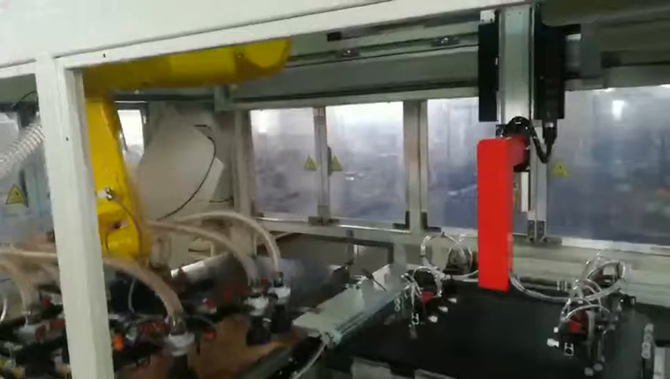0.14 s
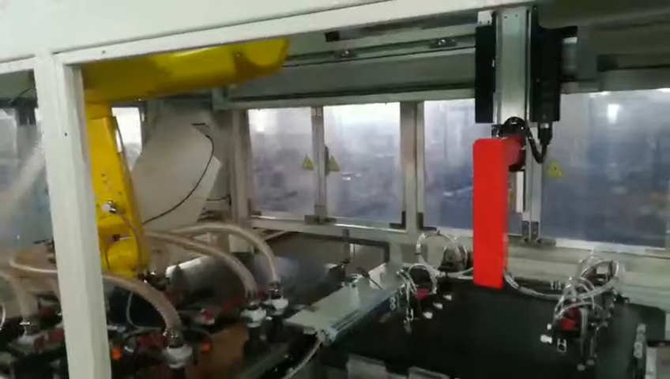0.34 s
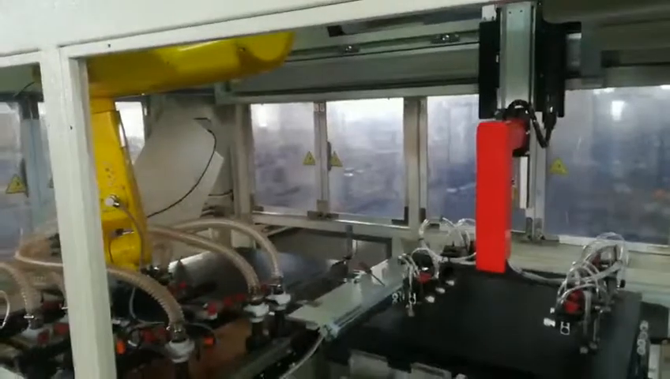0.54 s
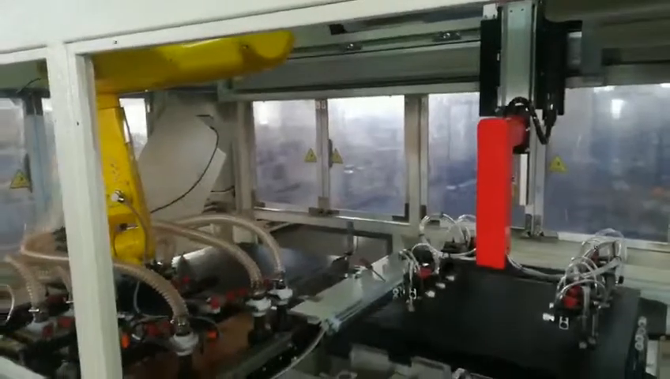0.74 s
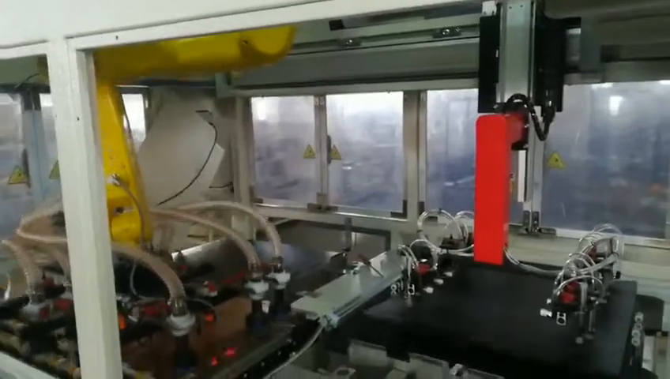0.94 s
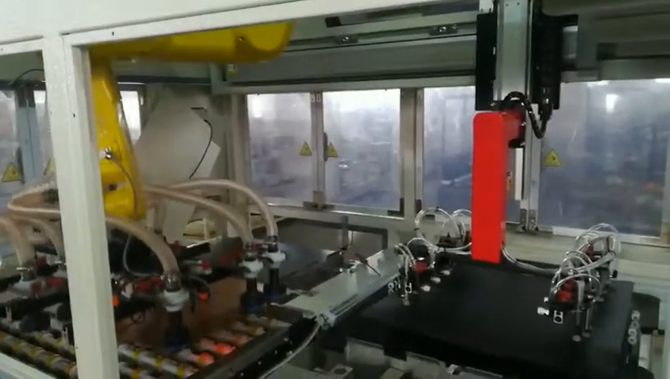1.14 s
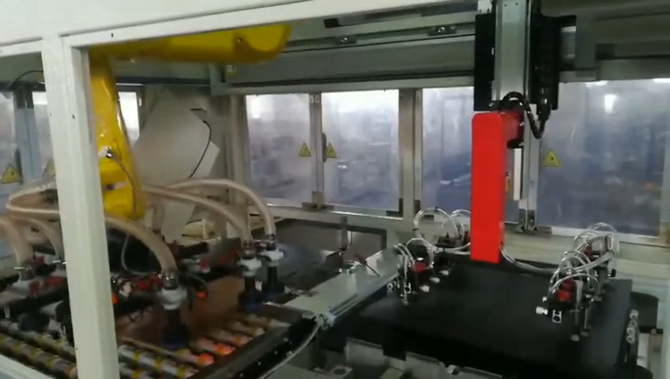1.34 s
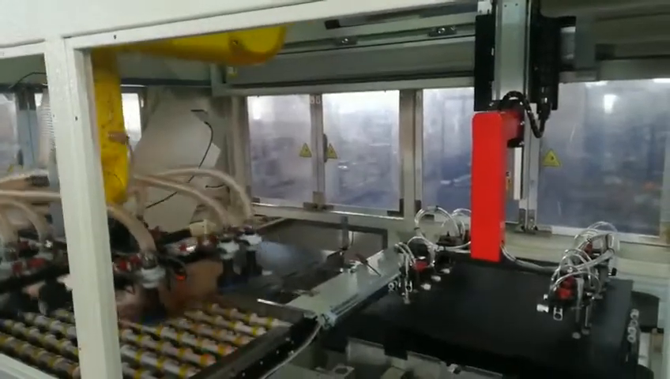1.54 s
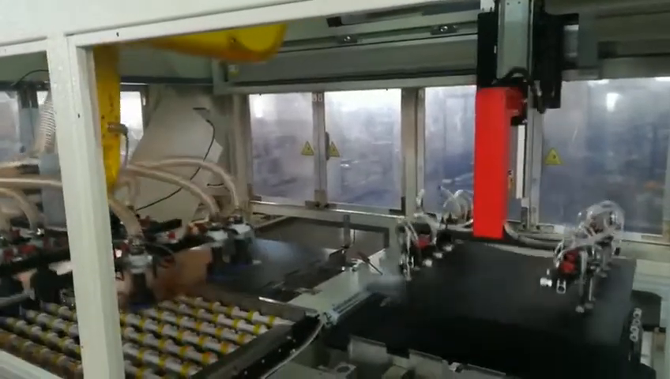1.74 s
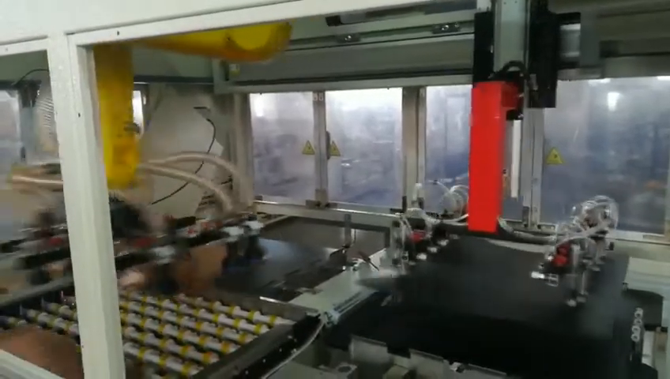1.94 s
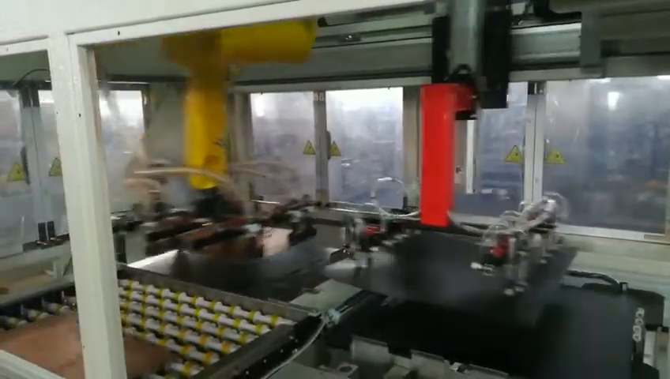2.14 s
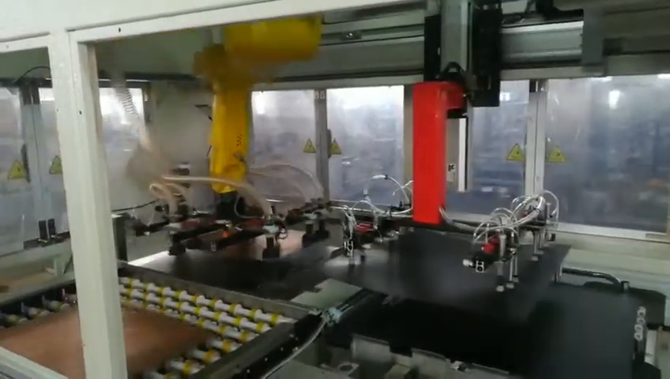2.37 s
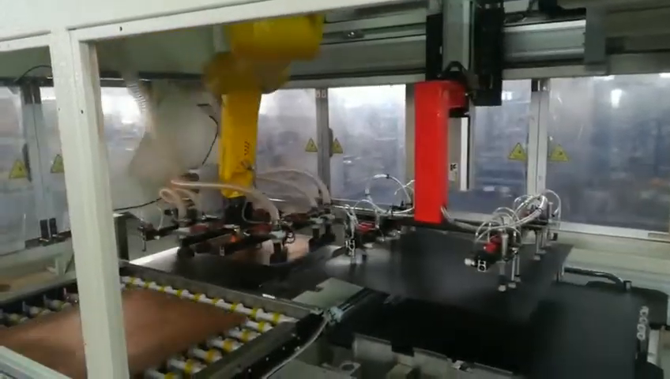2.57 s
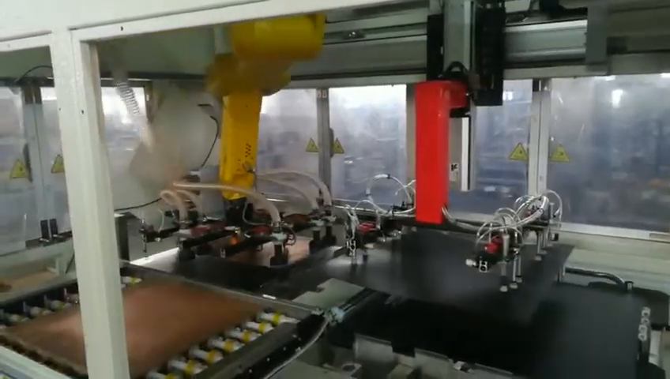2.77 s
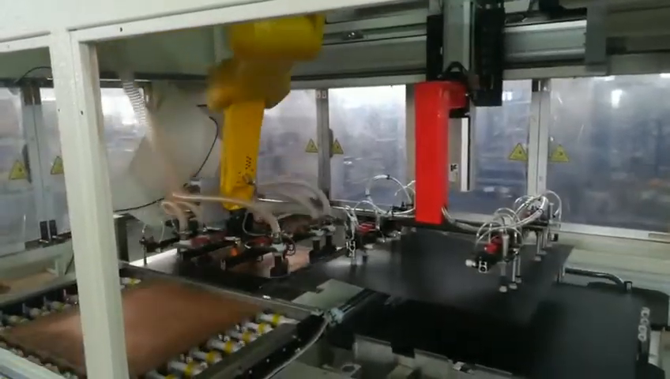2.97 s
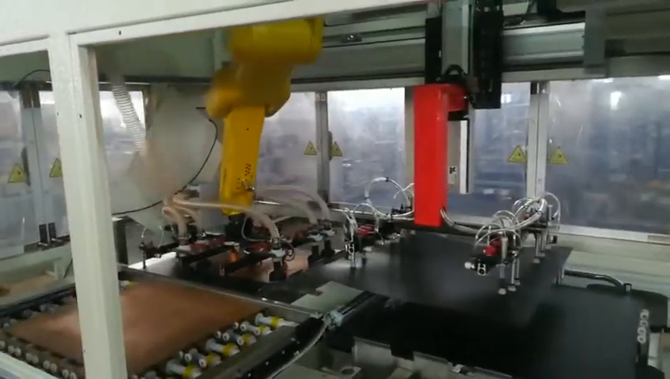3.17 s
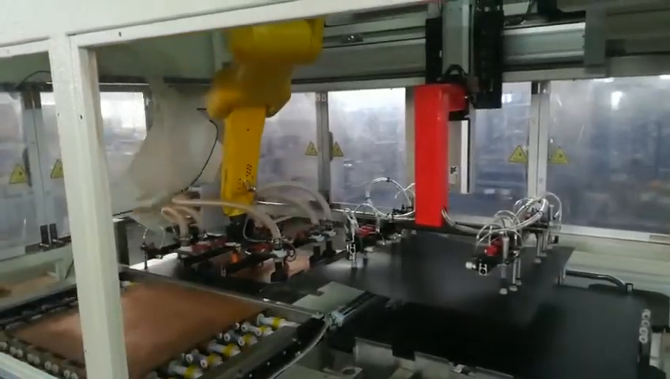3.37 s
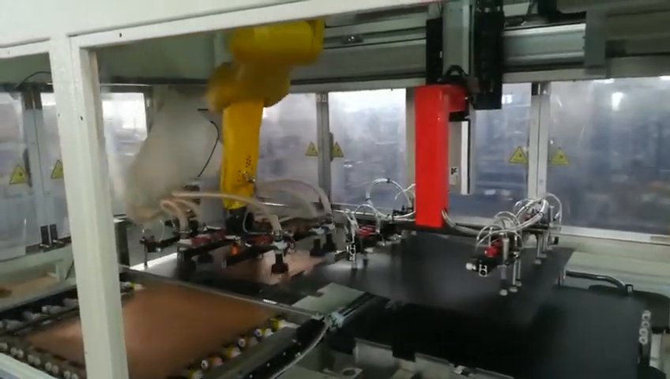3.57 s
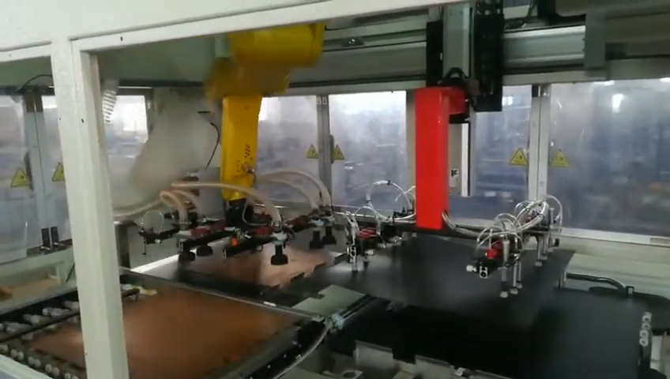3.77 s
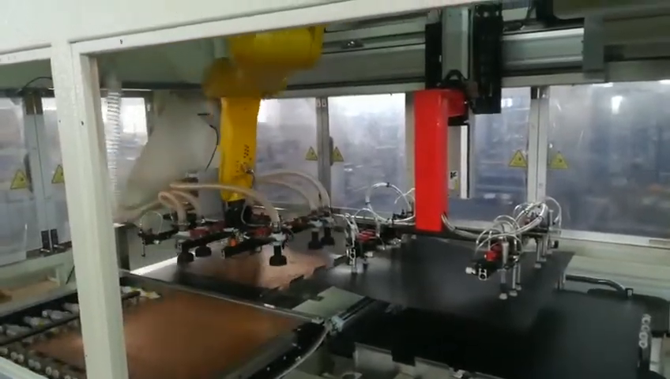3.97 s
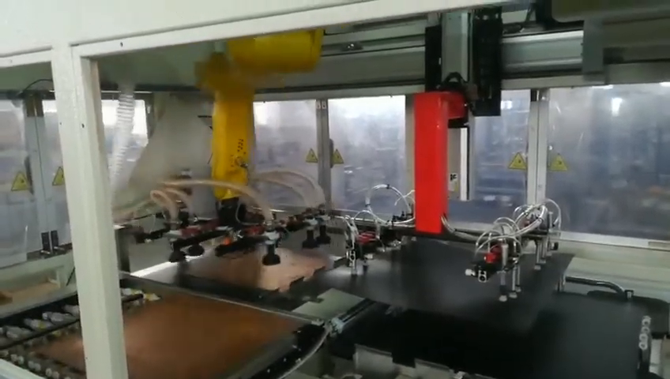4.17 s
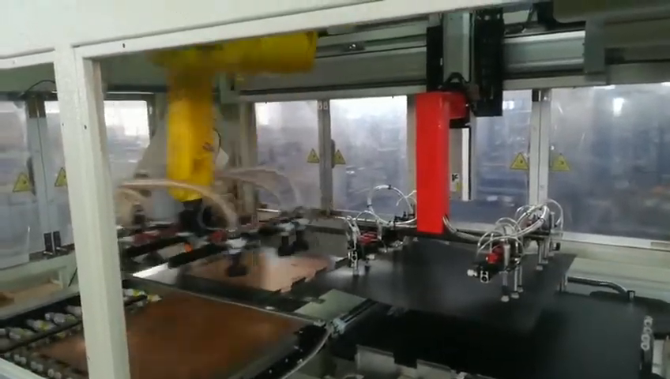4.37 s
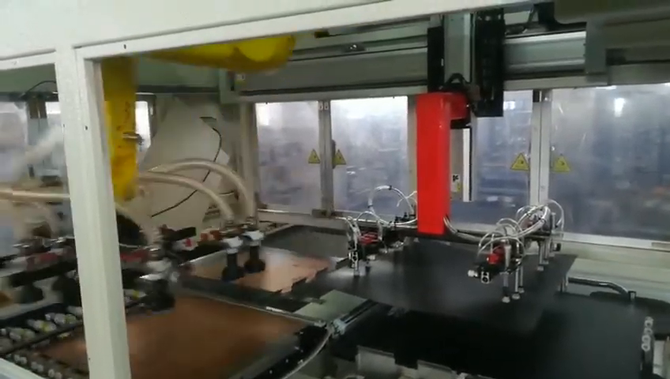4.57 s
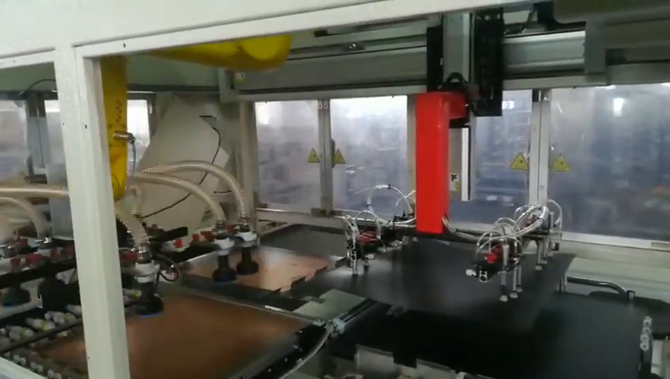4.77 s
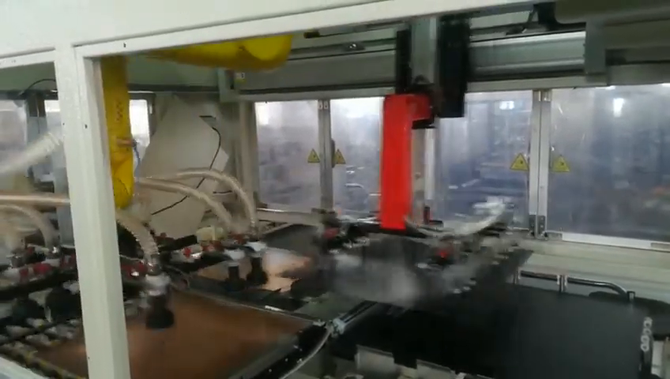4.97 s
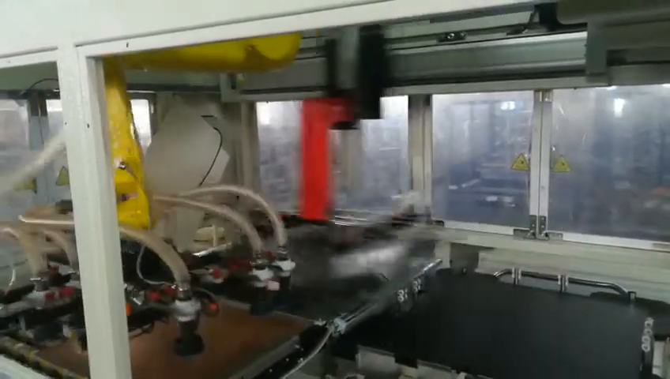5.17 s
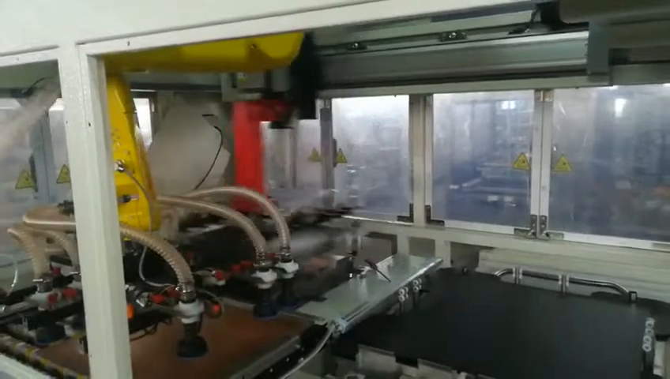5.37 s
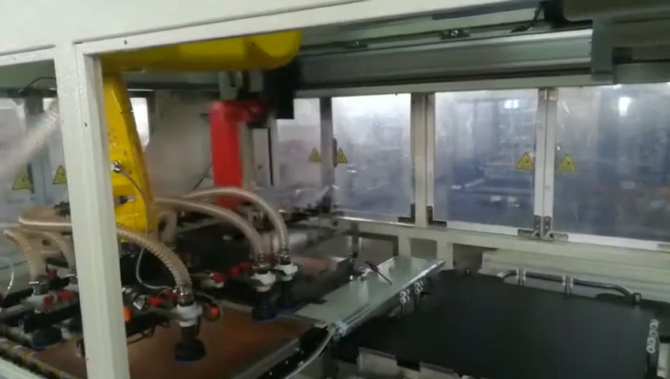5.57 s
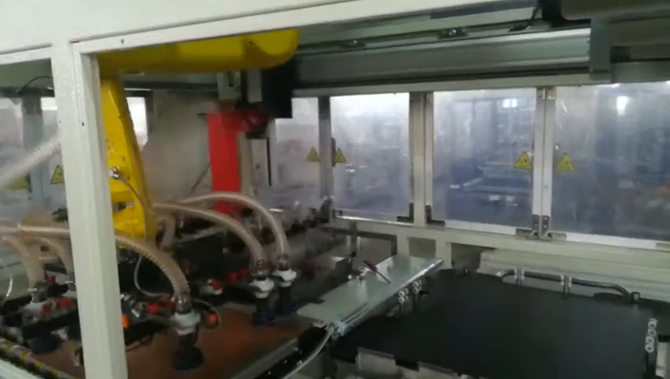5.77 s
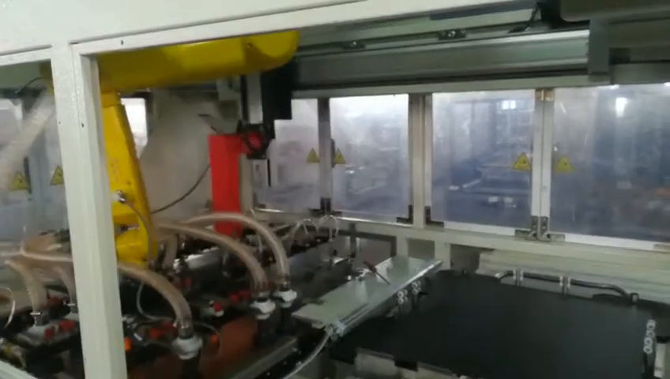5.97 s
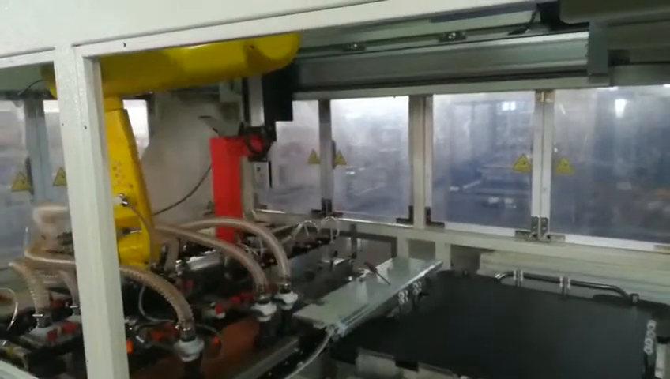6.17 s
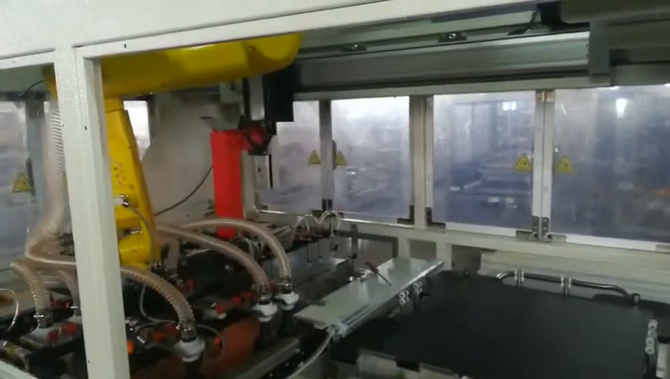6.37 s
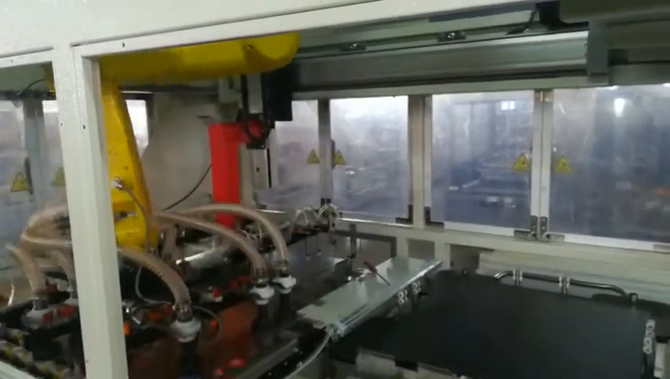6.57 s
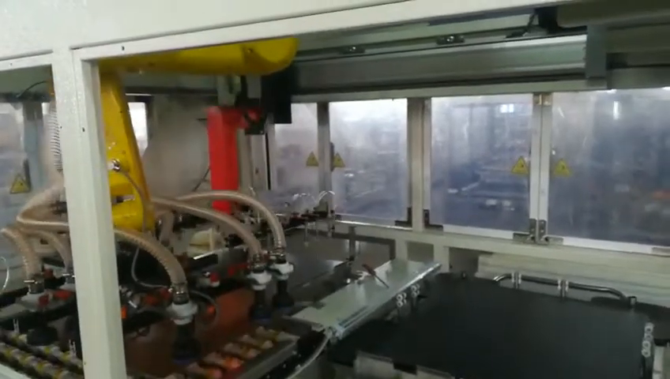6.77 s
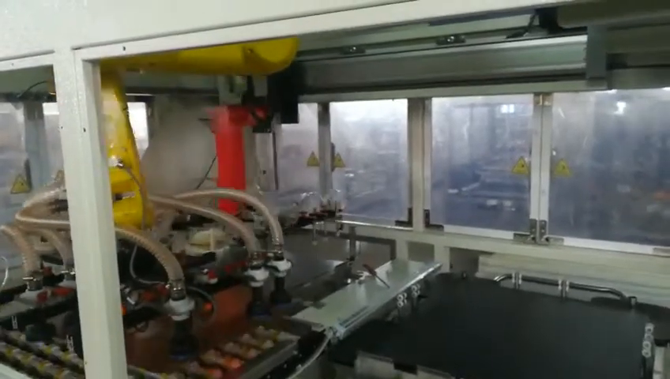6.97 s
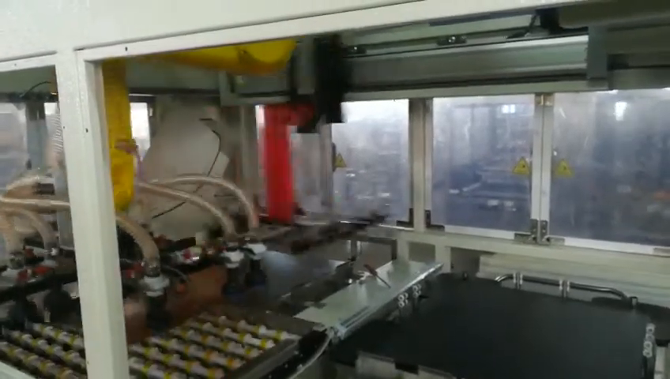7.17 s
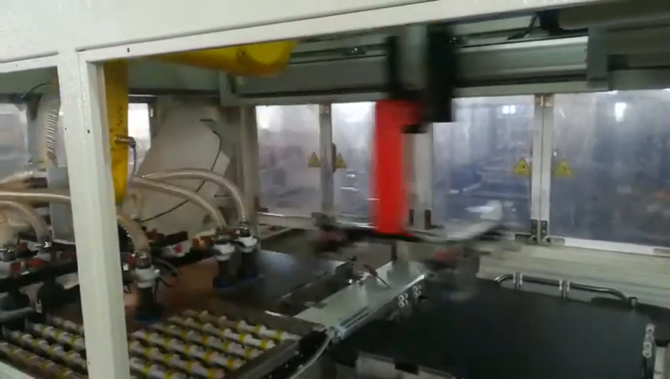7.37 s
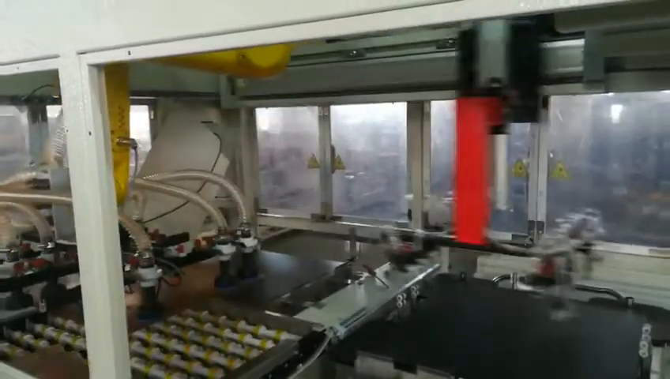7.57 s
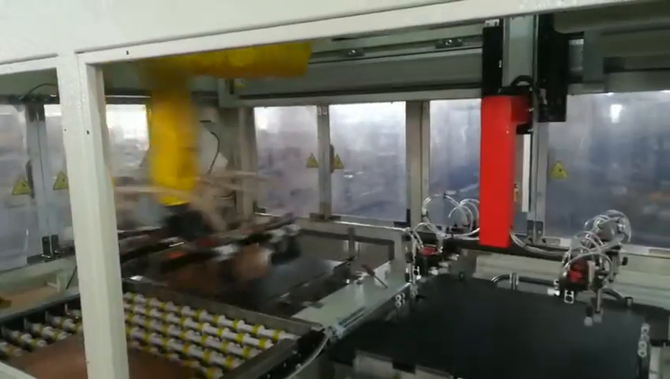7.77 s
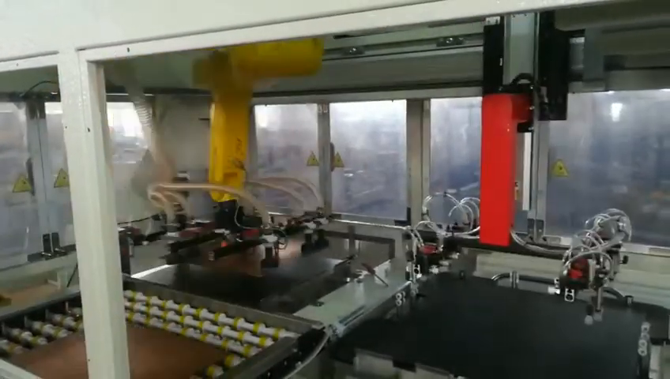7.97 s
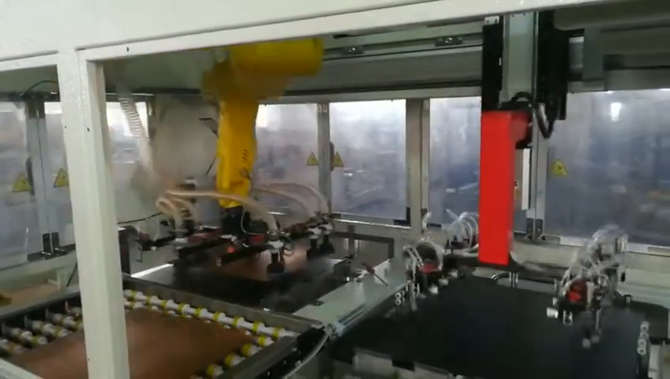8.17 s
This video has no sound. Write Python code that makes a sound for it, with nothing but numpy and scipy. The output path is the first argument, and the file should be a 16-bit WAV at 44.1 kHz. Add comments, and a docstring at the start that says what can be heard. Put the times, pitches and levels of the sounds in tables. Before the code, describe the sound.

Robot suction cell: whistling air hiss, sharp metallic clunks, blubbering hoses, a three-second lull in the hiss, then it resumes amid whirring motors.

```python
"""Vacuum ejectors hiss with a 5 kHz whistle, noise through silencer resonances, and stop for three seconds.
They feed the suction grippers of a robot cell that moves circuit boards. A suction blower whines, a tone
that sags under load; when its valve switches, air blubbers through hoses and cups as resonant noise.
Servo axes whirr as noise bands that follow speed, valves puff, and air and sliding hoses squeal.
The gripper clunks as a sum of decaying modes, and the factory hums all the while as shaped noise and tones."""
import sys
import numpy as np
from scipy import signal
from scipy.fft import rfft, irfft, next_fast_len
from scipy.io import wavfile
from scipy.ndimage import uniform_filter1d, map_coordinates

SR = 44100
rng = np.random.default_rng(int(sys.argv[2]) if len(sys.argv) > 2 else 0)


def put_to_file(sound):
    """Save the sound as 16-bit audio at rate SR, in the file named by the first command-line argument."""
    columns = np.atleast_2d(sound).T  # one column per channel
    safe = np.clip(columns, -1, 1)
    whole_steps = np.round(safe * 32767)
    wavfile.write(sys.argv[1], SR, whole_steps.astype(np.int16))


N = 362061

# Gulps of air through hoses and cups: start t/s, end t/s, boom delay/s, hose f/Hz, cup f/Hz,
# relative levels of boom/dB, flutter/dB, ring/dB
GULPS = [(.29, .314, .005, 240, 1467, -34, -21, -32), (.36, .8, .005, 185, 1400, -36, -40, -46),
         (3.25, 3.475, 0.049, 254.7, 1758, -25, -27, -27),
         (4.028, 4.251, 0.017, 328.8, 1690, -29.5, -33.5, -27.5),
         (5.949, 6.013, .016, 335, 1755, -24.5, -24.5, -36)]


def amp(db):
    """Level definition: decibels to an amplitude ratio."""
    return 10 ** (np.asarray(db) / 20)


def unit(x):
    """Normalisation: scale to an rms of 1."""
    return x / np.sqrt(np.mean(x ** 2) + 1e-20)


def clock():
    """Uniform sampling: the time of each sample in seconds."""
    return np.arange(N) / SR


def along(points, hz):
    """Interpolation of (f/Hz, value) points on a logarithmic frequency axis."""
    f, v = np.transpose(points)
    return np.interp(np.log(hz + 1), np.log(f + 1), v)


def colour(points):
    """Spectral envelope: gain by frequency from (f/Hz, level/dB) points."""
    return lambda hz: amp(along(points, hz))


def wobble(rate):
    """Slow random modulation: a smooth curve of rms 1 through `rate` random knots a second."""
    knots = rng.standard_normal(int(N * rate / SR) + 4)
    return unit(map_coordinates(knots, [clock() * rate]))


def gate(start, end, rise, fall):
    """Flow envelope: tanh attack, hold and exponential release."""
    t = clock()
    attack = .5 * (1 + np.tanh((t - start) / rise))
    return attack * np.exp(-(t - end).clip(0) / fall)


def bell(s, half):
    """Gaussian envelope that peaks at s and falls to 1/e at `half` seconds either side."""
    return np.exp(-np.minimum(abs(clock() - s) / half, 10) ** 2)


def filtered(x, response):
    """Linear filtering: multiply the spectrum of x by a response of frequency."""
    size = next_fast_len(N + 8192)
    return irfft(rfft(x, size) * response(np.fft.rfftfreq(size, 1 / SR)), size)[..., :N]


def placed(x, pan_db):
    """Interchannel level difference: lean a sound to the left (+) or right (-)."""
    return x * amp(np.array([[.5], [-.5]]) * pan_db)


def air(gain, pan=((1000, 0),)):
    """Turbulence: noise of rms 1 at two partly coherent microphones, the left one leading."""
    # left-right coherence: f/Hz, correlation
    alike = [(60, 1), (130, 0.97), (260, 1), (500, 0.13), (1200, 0.84), (2500, 0.093), (5000, 0.09),
             (9000, 0.04)]
    lead_s = .00018

    def heard(hz):
        phase = np.exp(1j * np.pi * hz * lead_s * np.array([[1], [-1]]))
        return placed(gain(hz), along(pan, hz)) * phase

    def mid_side(hz):
        turn = np.arccos(np.clip(along(alike, hz), -1, 1)) / 2
        return np.array([np.cos(turn), np.sin(turn)])

    mid, side = filtered(rng.standard_normal((2, N)), mid_side)
    return unit(filtered(np.array([mid + side, mid - side]), heard))


def resonant(hz, width_hz, shared):
    """Resonance: low-passed complex noise shifted to a centre that follows hz, partly shared in stereo."""
    b, a = signal.butter(2, np.clip(width_hz / SR, 1e-4, .9))
    noise = rng.standard_normal((3, len(hz))) + 1j * rng.standard_normal((3, len(hz)))
    carrier = np.exp(2j * np.pi * np.cumsum(hz) / SR)
    x = (signal.lfilter(b, a, noise) * carrier).real
    shared = np.clip(shared, 0, 1)
    return unit(np.sqrt(shared) * x[0] + np.sqrt(1 - shared) * x[1:])


def reflected(x, echo_db, sway_s):
    """Comb filtering: four echoes off the cell's walls and moving arms, with drifting delays."""
    out, index = x.copy(), np.arange(N)
    for delay in rng.uniform(.003, .022, 4):
        late = index - SR * (delay + sway_s * wobble(1.5))
        out += amp(echo_db) * np.array([np.interp(late, index, side) for side in x])
    return out / np.sqrt(1 + 4 * amp(2 * echo_db))


def load(start, end):
    """First-order lag: the motor's answer, 0 to 1, to a load that comes and goes."""
    lag_s = .085
    settled = lambda s: 1 - np.exp(-(clock() - s).clip(0) / lag_s)
    return settled(start) - settled(end)


def factory():
    """Background spectrum: shaped noise of fans and distant machines, with slightly unsteady motor tones."""
    # noise spectrum: f/Hz, relative level/dB per Hz
    hall = [(15, -39), (25, -1.5), (53, -6), (221, -9), (260, -9.5), (616, -22), (686, -18.5), (1030, -12),
            (2430, -16), (2940, -16.5), (3270, -18.5), (4900, -21.5), (5460, -29), (7750, -29),
            (15600, -50)]
    # further colour of that noise: f/Hz, level/dB
    hall_bands = [(28, -4.5), (50, 1.7), (170, 1.2), (300, .5), (450, 1.5), (620, 0), (950, 1), (2000, 2.2),
                  (4000, 0.5), (4900, 5.7), (5500, 6.5), (7900, 7), (10000, -1), (15000, 10.5)]
    # its balance: f/Hz, left-right level/dB
    hall_pan = [(400, 0), (1000, 3.5), (2400, -2.5), (3500, -7), (4700, 8), (6500, 0), (9500, -9),
                (15000, 2)]
    # motor tones: f/Hz, relative level/dB, left-right level/dB
    hum = [(59.2, -41.5, 0), (699.8, -50.5, 8), (1013, -53, 2), (1266, -51, 1)]
    din = amp(-29) * air(lambda f: colour(hall)(f) * colour(hall_bands)(f), hall_pan)

    def tone(hz):
        phase = 2 * np.pi * hz * clock() + 0.68 * wobble(8)
        return np.sqrt(2) * np.sin(phase) * amp(2.06 * wobble(6))

    return din + sum(placed(amp(db) * tone(hz), pan_db) for hz, db, pan_db in hum)


def blower():
    """Motor slip: the vane tone sags as suction loads the motor; sealed cups leak and the hose shudders."""
    # pulling on a board: from t/s, to t/s
    holds = [(.42, 3.2), (5.98, 8.4)]
    # the cups seal completely: from t/s, to t/s
    sealed = (3.55, 3.99)
    # swells and dips of the whine: peak t/s, half length/s, level/dB
    whine_swells = [(.43, 0.12, 11), (3.1, .3, -9), (4.04, .04, -8), (6.35, 0.18, 0)]
    # shudders of the sealed hose: peak t/s, level/dB
    shudders = [(3.6, -27), (3.655, -24), (3.75, -29), (3.84, -25.5), (3.915, -28), (3.995, -27)]
    # leak past the sealed cups: f/Hz, relative level/dB per Hz
    leak_air = [(1500, -15), (3500, -2), (4600, 0), (5300, -2), (6200, -11), (7100, -3.5), (9000, -17),
                (15000, -47)]
    holding = sum(load(start, end) for start, end in holds)
    vacuum = load(*sealed)
    gulping = sum(load(start, end) for start, end, *_ in GULPS)

    free_hz, hold_sag_hz, seal_sag_hz = 3022, 41.36, 160
    pitch = free_hz - hold_sag_hz * holding - seal_sag_hz * vacuum + 2.61 * wobble(25)
    free_db, hold_db, seal_db, gulp_db = -43.5, -1.5, 2.5, -5  # free level and its changes, before panning
    whine_db = free_db + hold_db * holding + seal_db * vacuum + gulp_db * gulping
    whine_db = whine_db + sum(db * bell(s, half) for s, half, db in whine_swells)
    paths = unit(amp(1.3 * np.array([wobble(14), wobble(14)])))  # each side fluctuates on its own
    vane_tone = np.sqrt(2) * np.sin(2 * np.pi * np.cumsum(pitch) / SR)
    whine = placed(vane_tone * paths, -15) * amp(whine_db)

    # the shudder's pitch falls as the vacuum builds
    shudder_hz = (100.3 - 19 * vacuum) * (1 + 0.099 * wobble(45))
    shudder = np.sqrt(2) * np.sin(2 * np.pi * np.cumsum(shudder_hz) / SR)
    shudder = shudder + .5 * resonant(1.4 * shudder_hz, 184, 0.88)
    shaking = sum(amp(db) * bell(s, half=.031) for s, db in shudders)
    leak = amp(-33.5) * gate(*sealed, rise=.02, fall=0.073) * air(colour(leak_air))
    return whine + shudder * shaking + leak


def hoses():
    """Cavity resonance: each gulp makes the rubber cups flutter and ring unevenly; later the hose booms."""
    # flutter spectrum: f/Hz, relative level/dB per Hz
    cups = [(200, -2.5), (400, -2.5), (580, -4), (730, -3.5), (950, 4), (1250, 3), (1700, -1.5),
            (2400, -1.5), (3500, -8.5), (7000, -22), (15000, -56)]
    rise_s, fall_s = .014, .049
    sag_db = -2  # flow towards the ends of a gulp against its middle
    cup_dip = .12  # share by which the ring falls as the cups flex in mid-gulp
    flaps = unit(amp(1.0 * wobble(260) + 0.84 * wobble(35)))
    flutter = amp(6.5) * flaps * air(colour(cups), [(500, 3.5), (1500, 3.0), (3000, -0.5)])
    wander = 1 + .04 * wobble(16)  # the resonances drift by this factor
    out = np.zeros((2, N))
    for start, end, delay, hose_hz, cup_hz, boom_db, flutter_db, ring_db in GULPS:
        near = (clock() > start - .1) & (clock() < end + .4)
        flow = gate(start, end, rise_s, fall_s)[near]
        filled = gate(start + delay, end + delay, rise_s, fall_s)[near]
        middle = bell((start + end) / 2, (end - start) / 3)[near]
        flow = flow * amp(sag_db * (1.5 - middle))
        bend, flex = wander[near], 1 - cup_dip * middle
        # two air modes of the hose
        boom = resonant(hose_hz * bend, 107, 0.93)
        boom = boom + amp(-7.5) * resonant(1.85 * hose_hz * bend, 250, 0.65)
        ring = amp(2.5) * flaps[near] * resonant(cup_hz * bend * flex, 350, 0.73)
        cup_sound = amp(flutter_db) * flutter[:, near] + amp(ring_db) * ring
        out[:, near] += amp(boom_db) * filled * boom + flow * cup_sound
    return out


def clunks():
    """Modal decay: a contact rings the gripper frame, and the cell's panels scatter the ring."""
    # contacts: t/s, peak level of the direct ring/dB
    contacts = [(.298, -13.5), (3.8405, -11), (5.957, -20)]
    # gripper frame modes: f/Hz, relative level/dB, 60 dB decay/s
    gripper = [(980, -2, .08), (1130, 0, .1), (1290, -1, .09), (1560, -5, .035), (1870, -2, .045),
               (2130, -3, .045), (3150, -12, .05)]
    out, t = np.zeros((2, N + SR)), np.arange(SR // 3) / SR
    for s, db in contacts:
        ring = 0
        for hz, level, t60 in gripper:
            decay = amp(level + rng.normal(0, 1) - 60 * t / t60)
            ring = ring + decay * np.sin(2 * np.pi * hz * t)
        ring = ring / abs(ring).max()
        panels = rng.standard_normal((2, len(t))) * amp(-60 * t / .11)
        panels = panels / np.linalg.norm(panels[0])
        echo = signal.fftconvolve(ring[None], panels, axes=1)[:, :len(t)]
        out[:, round(s * SR):][:, :len(t)] += amp(db) * (ring + echo)
    return out[:, :N]


def valves():
    """Blow-down: a valve dumps its line in a short puff of noise with exponential decay."""
    # vents: t/s, level/dB, rise/s, 60 dB decay/s
    vents = [(.3, -25, 0.009, 0.24), (3.012, -29, 0.052, .12), (3.09, -32.5, .03, 0.66),
             (3.19, -27.5, 0.024, 0.33), (3.262, -20, 0.028, 0.26), (5.965, -28, 0.012, .4)]
    # puff spectrum: f/Hz, relative level/dB per Hz
    vent_air = [(500, -29), (1500, -4), (2800, 8.5), (4000, 2.5), (5500, 3), (7500, -6.5), (10000, -14.5),
                (15800, -25)]
    t, flow = clock(), 0
    for s, db, rise, t60 in vents:
        onset = np.exp(-((t - s).clip(None, 0) / rise) ** 2)
        flow = flow + amp(db - 60 * (t - s).clip(0) / t60) * onset
    return flow * air(colour(vent_air))


def ejectors():
    """Jet noise and resonance: a broad jet, and a breathy silencer whistle with a sharp wandering core."""
    # ejectors, often several at once: opens t/s, closes t/s, die-away/s, whistle f/Hz, core sharpness/dB,
    # relative levels of whistle/dB, rush/dB, sizzle/dB, intake/dB
    units = [(.3, 3.015, .025, 4964, -4, -27, -41, -43.5, -42),
             (.35, 0.88, 0.1196, 5025, -2, -23.3, -35, -44, -31),
             (1.06, 2.03, .06, 4928, -8, -29.3, -48, -55, -38.5),
             (5.99, 8.4, 0.028, 4957, -3, -26.5, -43.5, -50, -36),
             (6.06, 6.38, 0.0802, 4850, -10, -22, -38.5, -45.5, -36.5),
             (7.19, 7.56, .14, 4960, -10, -25, -51.5, -52.5, -37)]
    # silencer resonances: f/Hz, width/Hz, relative level/dB
    nozzle = [(4883, 440, -2), (7690, 280, -14.5)]
    # the whistle catches and flares: t/s, level over its steady level/dB
    flares = [(.425, 3), (1.612, 6.5), (1.899, 7.5), (2.06, 5)]
    # jet spectrum: f/Hz, relative level/dB per Hz
    jet_air = [(500, -35), (1200, -7), (2200, 1), (3000, -1.5), (3800, -15.5), (5600, -3.5), (7000, -5),
               (8200, -7.5), (9200, -17), (11000, -24), (15800, -45)]
    # balance of jet and sizzle: f/Hz, left-right level/dB
    jet_pan = [(1000, 6), (2400, -2.5), (4500, -13.5), (6500, -.5), (9500, -5.5), (12000, -8.5),
               (15500, -3)]
    # sizzle spectrum: f/Hz, relative level/dB per Hz
    sizzle_air = [(6000, -18), (8500, -3), (9500, 4), (10600, -3.5), (12100, -0.5), (14000, -4.5),
                  (15800, -10.5)]
    # air drawn in at the cups: f/Hz, relative level/dB per Hz
    intake_air = [(2000, -19), (3200, -2), (4000, 0), (4500, 2.5), (5300, -17.5), (6500, -29.5)]
    opens, closes, falls, whistle_hz, sharp_db, *levels_db = np.transpose(units)
    flows = [gate(start, end, .04, fall) for start, end, fall in zip(opens, closes, falls)]
    power = np.array(flows) ** 2 + 1e-12
    whistling, rushing, sizzling, drawing = np.sqrt(amp(levels_db) ** 2 @ power)  # powers add
    # each ejector's share of the whistle power weights the tone, so the loudest dominates
    share = amp(levels_db[0])[:, None] ** 2 * power / whistling ** 2

    def silencer(f):
        return sum(amp(db) / (1 + ((f - hz) / (width / 2)) ** 2) ** 0.76 for hz, width, db in nozzle)

    focus_db = sharp_db @ share
    core = placed(resonant(whistle_hz @ share + 24 * wobble(9), 47, 0.54), 3.3) * amp(focus_db)
    # when the whistle loses its core, it spreads into a wide band
    spread = placed(resonant(np.full(N, 4930.), 800, 0.36), 2.6) * amp(-focus_db - 14.5)
    breath = air(silencer, [(5000, 7.5), (7600, -3.5)])
    flare_db = sum(db * bell(s, half=.0066) for s, db in flares)
    whistle = unit(breath + core + spread) * amp(5.0 + 0.58 * wobble(30) + flare_db)

    gusts = amp(0.74 * wobble(20) + 0.83 * wobble(5))
    jet = air(colour(jet_air), jet_pan) * amp(10.5)
    sizzle = air(colour(sizzle_air), jet_pan) * amp(7.5 + 0.55 * wobble(22) + 0.5 * wobble(7))
    intake = air(colour(intake_air), [(4000, 0.57)]) * amp(7.5 + 1.7 * wobble(8))
    rush = gusts * (jet * rushing + sizzle * sizzling + intake * drawing)
    return reflected(rush, echo_db=-12, sway_s=.00012) + whistle * whistling


def axes():
    """Rolling and gear-mesh noise: rails rush in each move, and gears whirr higher and louder with speed."""
    # carriages on their rails: peak t/s, half length/s, relative level/dB
    travels = [(.8, 0.19, -33.5), (2.01, 0.29, -33), (2.674, 0.27, -32.5), (4.468, 0.15, -33),
               (4.693, 0.1, -40.5), (5.13, 0.21, -30), (7.346, 0.4, -30), (7.736, 0.27, -39)]
    # rail spectrum: f/Hz, relative level/dB per Hz
    rails = [(80, -15), (300, -6), (600, -9.5), (1000, 3), (1500, 6), (3200, 3), (5000, -0.5), (7500, -7),
             (10000, -16.5), (15800, -30)]
    # servo gears: top speed t/s, half length/s, top-speed f/Hz, share lower at rest, width/Hz,
    # relative level/dB
    whirrs = [(1.436, .033, 3060, 0.0302, 100, -32.5), (2.07, .14, 1850, .1, 700, -35),
              (2.767, .055, 1850, .2, 1400, -30), (4.45, .1, 1900, .12, 280, -30),
              (4.468, .072, 3170, .4, 300, -32), (5.074, .05, 3190, .15, 280, -33.5),
              (5.215, .17, 960, .3, 160, -35), (7.02, .04, 3080, 0.0303, 130, -34),
              (7.22, .1, 920, .25, 140, -34), (7.84, .1, 1897, .1, 800, -33.5)]
    travel = sum(amp(db) * bell(s, half) for s, half, db in travels)
    rolling = reflected(air(colour(rails)), echo_db=-9.0, sway_s=0.00028)
    out = travel * rolling * amp(4.0 + 1.3 * wobble(60))
    for s, half, hz, droop, width_hz, db in whirrs:
        near = abs(clock() - s) < 2 * half
        speed = bell(s, half)[near]
        mesh_hz = hz * (1 - droop * (1 - speed))
        # a blurred band around the tooth tone
        gears = resonant(mesh_hz, width_hz, 0.57) + 0.5 * resonant(mesh_hz, width_hz / 4, 0.8)
        # loaded while speeding up, quiet once braking
        loudness = speed ** np.where(clock()[near] < s, .7, 2.2)
        out[:, near] += amp(db) * loudness * gears
    return out


def squeals():
    """Band-limited turbulence: air and sliding hoses squeal as brief swells of hiss in one high band."""
    # squeals: peak t/s, half length/s, f/Hz, level/dB
    swells = [(2.019, .11, 7000, -33), (3.02, .018, 6300, -30), (4.372, .07, 7220, -33.5),
              (4.472, 0.052, 5870, -27.5), (4.56, .04, 7470, -31.5), (7.799, .12, 6960, -33)]
    out = np.zeros((2, N))
    for s, half, hz, db in swells:
        near = abs(clock() - s) < 2 * half
        hiss = resonant(np.full(near.sum(), hz), width_hz=1270, shared=0.4)
        out[:, near] += amp(db) * bell(s, half)[near] * hiss
    return out


def scene():
    """Superposition: everything in and around the cell."""
    return factory() + blower() + hoses() + clunks() + valves() + ejectors() + axes() + squeals()


def record(dry):
    """Compression and band limiting: after a silent start, gain falls gently with the short-term level."""
    start_s, top_hz = .245, 15780
    live = dry * (clock() > start_s)
    mean_power = uniform_filter1d(np.mean(live ** 2, axis=0), SR // 4)  # over a quarter second
    level_db = 10 * np.log10(abs(mean_power) + 1e-12)
    gain_db = -.28 * np.maximum(level_db + 27, 0)  # acts above -27 dB
    return filtered(live * amp(gain_db), lambda hz: hz < top_hz)


dry = scene()
out = record(dry)
put_to_file(out)
```